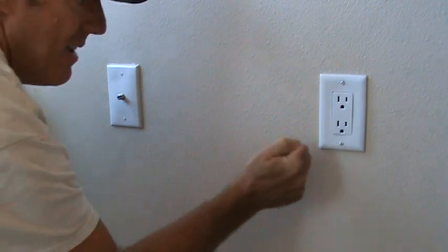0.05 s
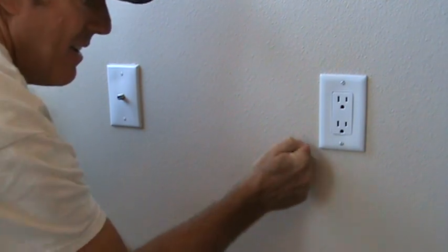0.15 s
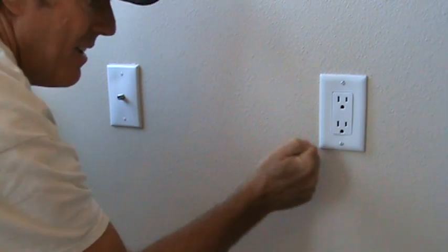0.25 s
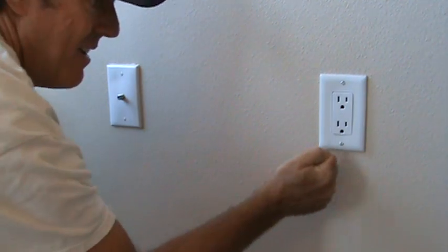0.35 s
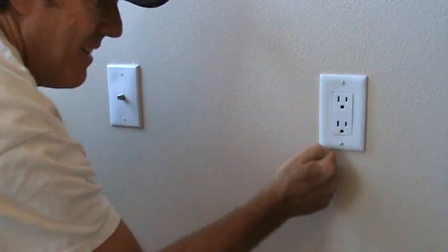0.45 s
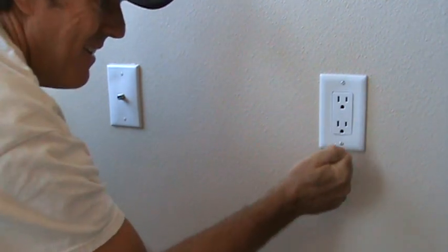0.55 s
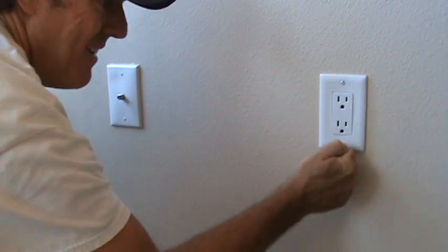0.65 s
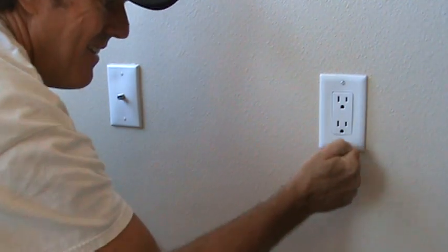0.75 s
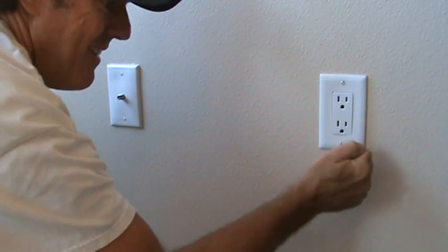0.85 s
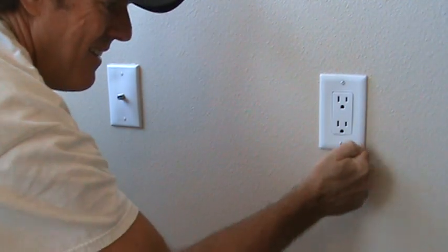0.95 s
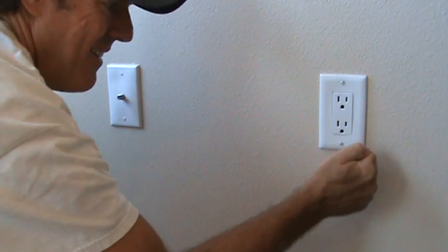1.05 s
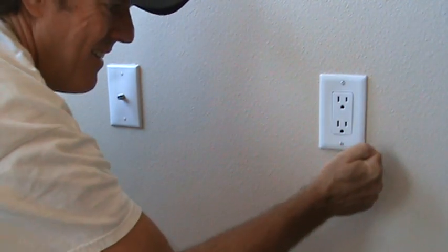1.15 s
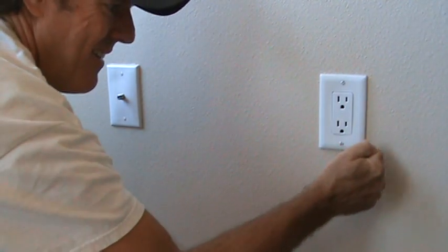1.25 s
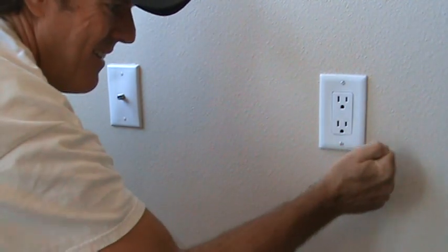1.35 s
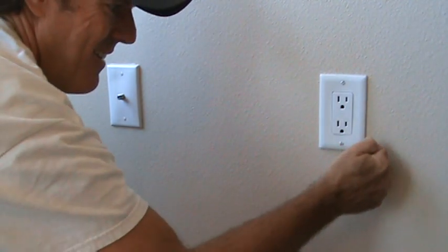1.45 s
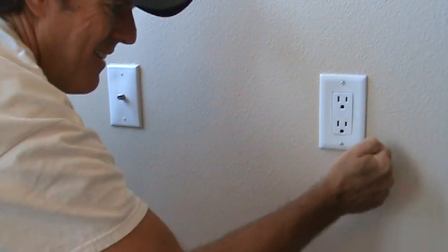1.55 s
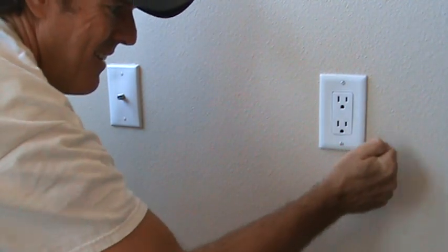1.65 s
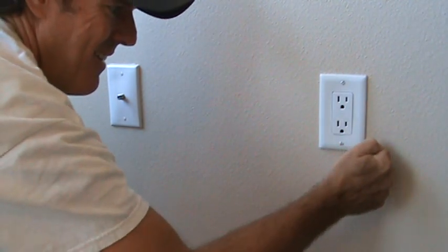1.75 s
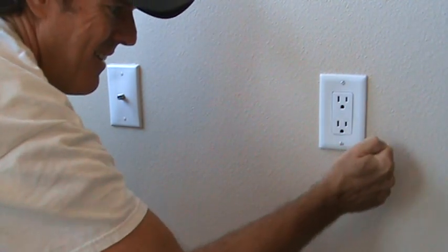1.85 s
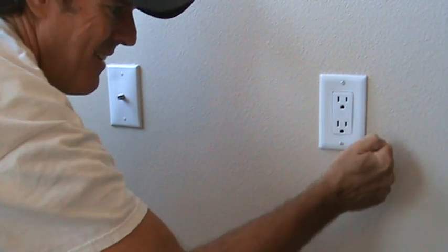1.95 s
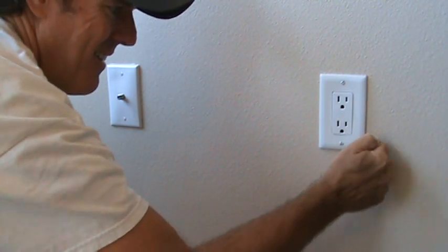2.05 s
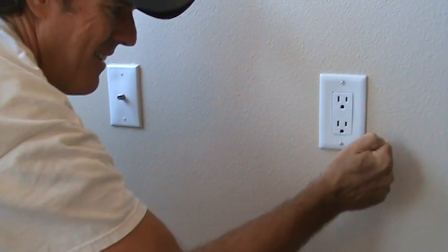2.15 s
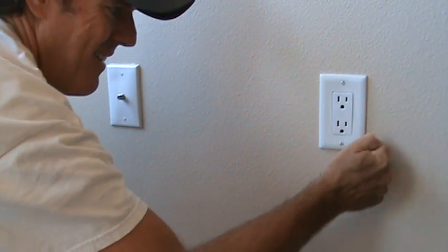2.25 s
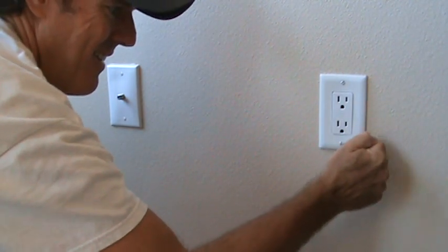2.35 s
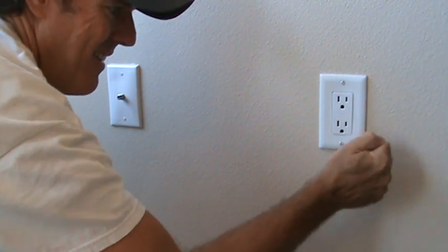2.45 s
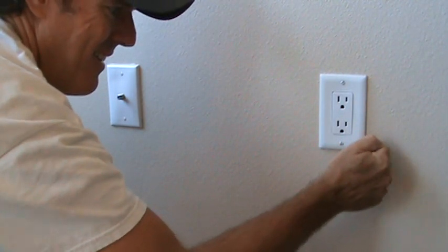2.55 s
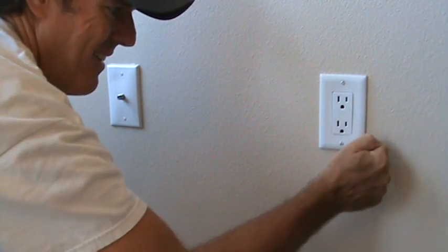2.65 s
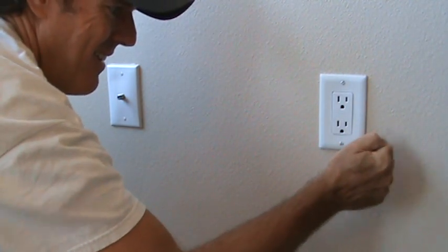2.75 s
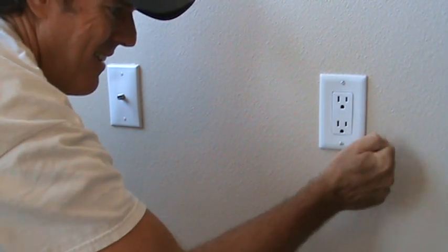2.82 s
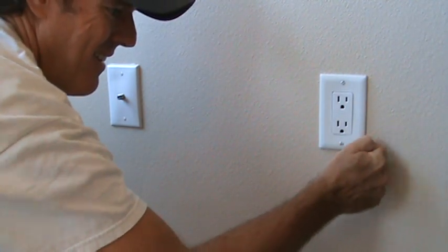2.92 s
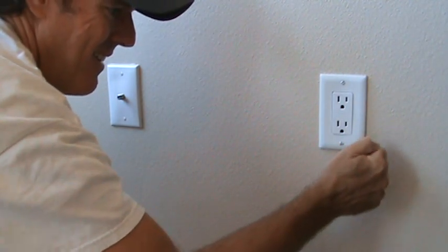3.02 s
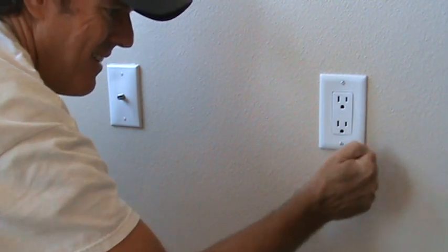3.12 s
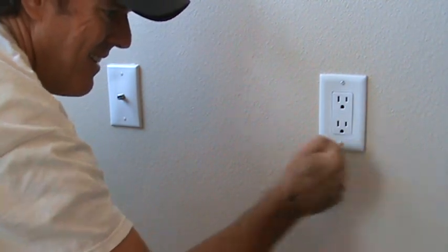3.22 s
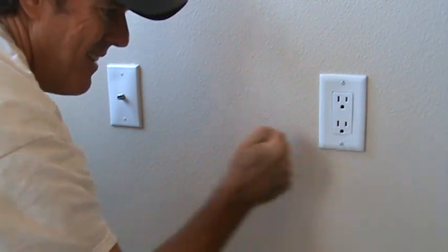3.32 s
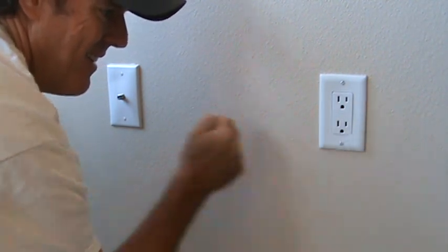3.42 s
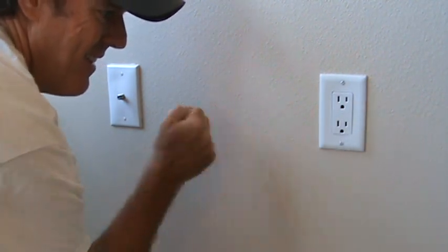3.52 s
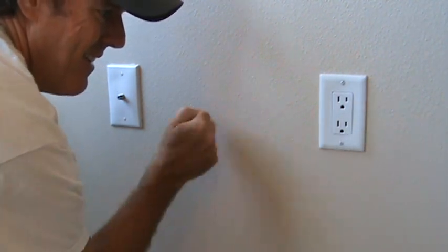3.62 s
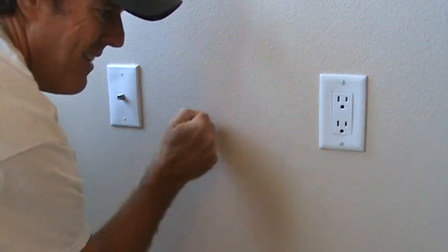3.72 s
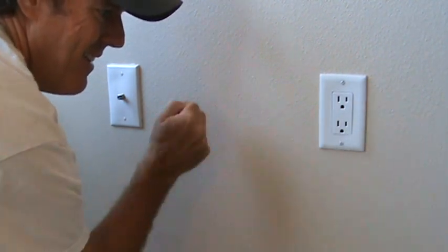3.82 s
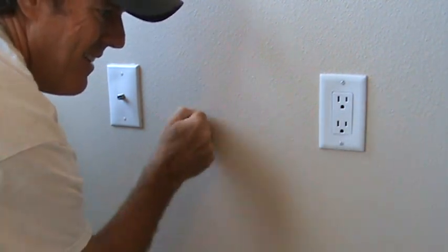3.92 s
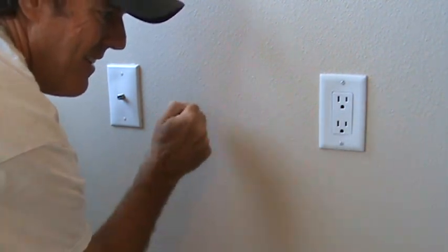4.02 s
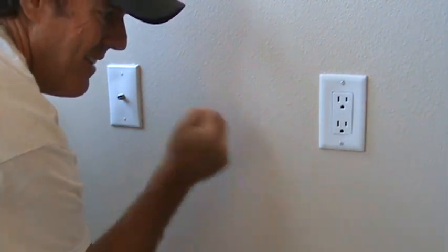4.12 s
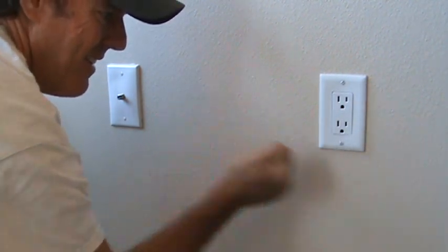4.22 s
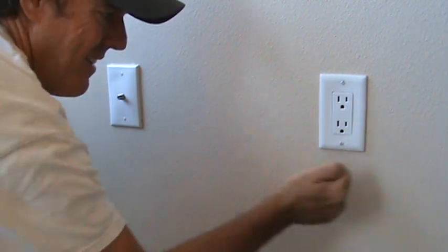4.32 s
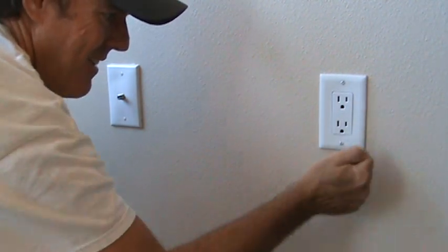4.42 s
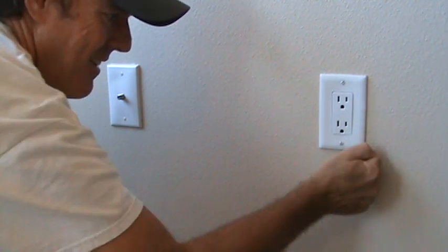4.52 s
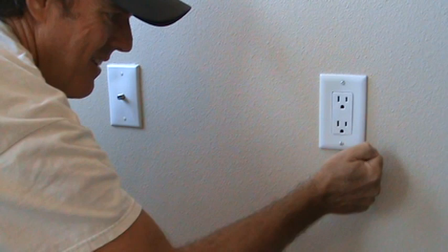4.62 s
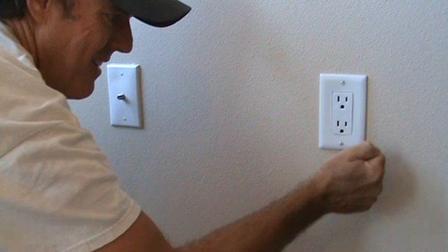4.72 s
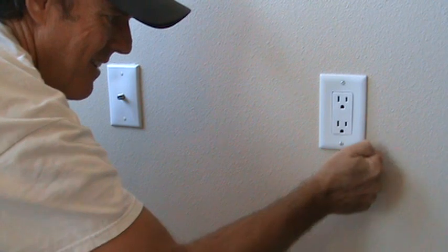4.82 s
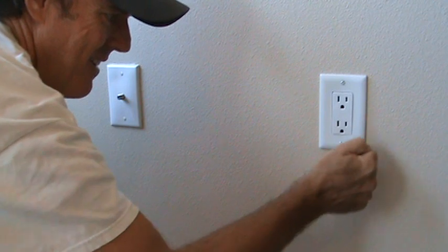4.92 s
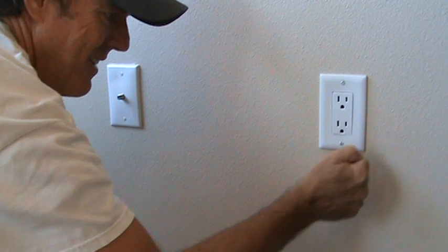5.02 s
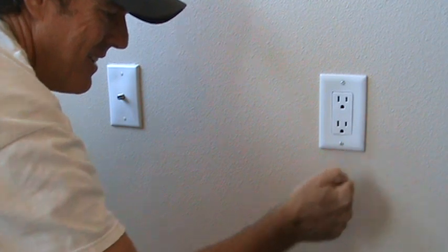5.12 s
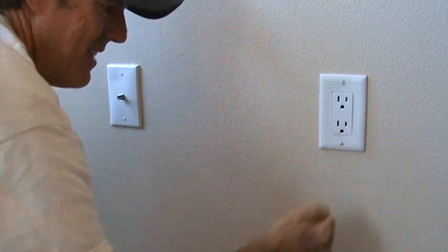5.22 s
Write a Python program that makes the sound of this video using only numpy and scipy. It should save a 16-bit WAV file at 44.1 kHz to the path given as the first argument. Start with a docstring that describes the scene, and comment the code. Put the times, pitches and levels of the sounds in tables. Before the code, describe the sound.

Knuckles rap evenly along a hollow plasterboard wall, with two tighter, firmer knocks over a stud, above a steady ventilation rush.

```python
"""Knuckles rap along a plasterboard wall, hunting for a stud: thirteen hollow knocks (the first with a
light second touch) and two tighter ones. Each blow is a force pulse that excites the board's damped modes,
boomier mid-bay and tighter over the stud; surfaces and the walls of a small room answer with echoes and a
noise tail, whose treble swells and then stops. Soft low thumps, the dying boom of an earlier knock and then
shifting weight, are damped swings. The steady rush of house ventilation is shaped noise with faint tones."""
import sys
import numpy as np
from scipy import signal
from scipy.fft import rfft, irfft
from scipy.io import wavfile

SR = 44100
rng = np.random.default_rng(int(sys.argv[2]) if len(sys.argv) > 2 else 0)


def int16_out(signal):
    """Quantize to a 16-bit WAV file."""
    q = np.round(np.clip(np.atleast_2d(signal).T, -1, 1) * 32767)
    wavfile.write(sys.argv[1], SR, q.astype(np.int16))


N = 232633

RING = 40000  # length of an impulse response, samples
TIME = np.arange(RING) / SR  # s


def undb(db):
    """Level to amplitude ratio: 20 dB is a factor of ten."""
    return 10 ** (np.asarray(db) / 20)


def curve(points, hz):
    """Interpolate (frequency [Hz], value) points on a logarithmic frequency axis."""
    point_hz, value = np.transpose(points)
    return np.interp(np.log(np.maximum(hz, 1)), np.log(point_hz), value)


def add(out, sound, start_s):
    """Superposition: pressures add, so mix a sound into out from start_s."""
    i = max(int(start_s * SR), 0)
    out[:, i:i + sound.shape[-1]] += sound[..., :N - i]


def ring(hz, t60):
    """Free vibration of one mode: a sine whose level falls 60 dB in t60 seconds."""
    return np.sin(2 * np.pi * hz * TIME) * undb(-60 * TIME / t60)


def ventilation(air_db=-41, pan_db=-.5, start_db=1.02, end_db=-0.15):
    """Broadband flow noise coloured by duct resonances, easing slightly, with tones of fan and electrics."""
    # spectrum of the rush: (frequency [Hz], relative density [dB])
    air_spectrum = [(25, -1), (50, -2.5), (82, -9.5), (122, -2.5), (165, -6), (260, -0.5), (350, -3.5),
                    (600, -9), (900, -12.5), (2200, -22), (3200, -25.5), (6000, -33.5), (9500, -40),
                    (15500, -41.5)]
    # stereo width of the rush: (frequency [Hz], side minus mid [dB])
    air_side = [(40, -21), (120, -8.5), (350, -11.5), (1000, -6), (2500, -6), (7000, -4.5), (13000, -7.5)]
    # duct resonances: (frequency [Hz], width [Hz], boost [dB])
    duct = [(369, 18, 4), (1415, 84, 3), (2250, 440, 4)]
    # steady hum and whine: (frequency [Hz], rms level before the left-right balance [dB])
    tones = [(118.4, -55.5), (258.4, -60), (328.4, -60), (500.6, -59.5), (2824, -74.5), (3431, -77),
             (10160, -87)]

    hz = np.fft.rfftfreq(N, 1 / SR)
    density_db = curve(air_spectrum, hz)
    for centre_hz, width_hz, boost_db in duct:
        density_db = density_db + boost_db / (1 + (2 * (hz - centre_hz) / width_hz) ** 2)

    mid, side = rfft(rng.standard_normal((2, N))) * undb(density_db)
    mid = irfft(mid, N)
    side = irfft(side * undb(curve(air_side, hz)), N)
    easing_db = np.linspace(start_db, end_db, N)
    air = np.array([mid + side, mid - side]) * undb(air_db + easing_db) / mid.std()

    t = np.arange(N) / SR
    hum = np.zeros(N)
    for tone_hz, level_db in tones:
        hum += np.sqrt(2) * undb(level_db) * np.sin(2 * np.pi * (tone_hz * t + rng.random()))
    balance = undb(np.array([[pan_db], [-pan_db]]) / 2)
    return (air + hum) * balance


def thumps(rise_s=0.0013, right_lag_s=0.0039, decay_cycles=6.8, settle_s=0.0308, settle_db=-4.5):
    """Damped free vibration: each soft low thump is a slow swing, followed by a weaker second one."""
    # soft low thumps of shifting weight; the one at 0.0 s is the dying boom of an earlier knock:
    # (time [s], level [dB], frequency [Hz])
    low_thumps = [(0.0, -22.5, 79), (0.177, -16, 59.3), (0.288, -15, 80), (0.776, -21, 71),
                  (3.593, -20, 41.2), (3.79, -23.5, 48), (3.874, -17, 58.7), (3.976, -22, 90),
                  (4.15, -26.5, 58.3)]

    out = np.zeros((2, N))
    for start_s, level_db, hz in low_thumps:
        decay = ring(hz, decay_cycles / hz)  # 60 dB down after decay_cycles swings
        left = undb(level_db) * decay * (1 - np.exp(-TIME / rise_s))
        right = np.interp(TIME - right_lag_s, TIME, left)
        swing = np.array([left, right])
        add(out, swing, start_s)
        add(out, undb(settle_db) * swing, start_s + settle_s * rng.uniform(0.49, 1.98))
    return out


def reflections(stud_trip_ms=4.208, first_return=-0.84, second_return=0.18, smear=0.0073):
    """Reflection: the bending wave first returns from the studs inverted; later the room sends echoes."""
    # later echoes from surfaces and the room's walls: (delay [ms], gain [ratio, negative = inverted])
    room_echoes = [(14.43, 0.21), (20.59, -0.24), (43.19, -0.25), (68.0, -0.044)]

    ms = 1000 * TIME[:4096]
    out = np.zeros(len(ms))
    out[0] = 1  # the direct sound
    stud_returns = [(stud_trip_ms, first_return), (2 * stud_trip_ms, second_return)]
    for delay_ms, gain in [*stud_returns, *room_echoes]:
        # the spread is a fixed share of the delay: the later, the duller
        pulse = np.exp(-.5 * ((ms - delay_ms) / (smear * delay_ms)) ** 2)
        out += gain * pulse / pulse.sum()
    return out[None]


def room(side=1.0, build_s=0.009):
    """Diffuse reverberation: band noise with its own decay per band follows the direct sound and returns."""
    # reverberation: (frequency [Hz], 60 dB decay time [s]); a negative time makes the band swell
    decay_times = [(60, 1.5), (130, 0.1), (250, 0.4), (600, 0.5), (1500, -0.4)]
    # colour of the tail: (frequency [Hz], level [dB])
    tail_colour = [(50, -14.5), (130, -6), (300, -6.5), (600, -6), (850, -6), (1200, -10)]

    hz = np.fft.rfftfreq(RING, 1 / SR)
    mid, wide = rng.standard_normal((2, RING))
    noise = rfft(np.array([mid + side * wide, mid - side * wide]))
    build = 1 - np.exp(-(TIME / build_s) ** 2)
    edges = 35 * 2 ** np.arange(0, 8, .5)  # half-octave bands, Hz
    out = np.zeros((2, RING))
    for low, high in zip(edges, edges[1:]):
        centre = np.sqrt(low * high)
        band = irfft(noise * ((hz >= low) & (hz < high)), RING)
        # bands above about 1.1 kHz swell until the response ends
        decay = np.exp(-np.log(1000) * TIME / curve(decay_times, centre))
        tail = band * decay * build
        share = 2 * (high - low) / SR  # the band's part of the whole spectrum
        energy = np.sum(tail ** 2, axis=1, keepdims=True)
        out += tail * undb(curve(tail_colour, centre)) * np.sqrt(share / energy)
    out[:, 0] += 1  # the direct sound
    return signal.fftconvolve(out, reflections(), axes=1)[:, :RING]


def board(modes):
    """Modal superposition: the board's answer to a tap, left and right, with alternating mode signs."""
    out = np.zeros((2, RING))
    for k, (hz, level_db, t60, pan_db) in enumerate(modes):
        sides = undb(level_db + np.array([pan_db, -pan_db]) / 2)
        out += (-1) ** k * np.outer(sides, ring(hz, t60))
    return out


def wall(modes, space, dent_db, dent_hz, dent_t60=0.0072, fade_s=0.3):
    """Local and global response: the struck spot snaps at once, the board rings till the frame soaks it up."""
    fading = board(modes) * np.exp(-(TIME / fade_s) ** 2)
    ringing = signal.fftconvolve(fading, space, axes=1)[:, :RING]
    return ringing + undb(dent_db) * ring(dent_hz, dent_t60)


def blow(contact_ms, follow_db, flesh_ms=2.4, scatter=0.2, scatter_s=0.0041):
    """Impact force: the knuckle's brief bump, 1 ms in, and the slower push of the fist behind it."""
    t = TIME[:1024]
    ms = 1000 * t - 1
    bone = np.exp(-8 * (ms / contact_ms) ** 2)
    flesh = np.exp(-np.abs(ms) / flesh_ms) * (ms > 0)
    force = bone / bone.sum() + undb(follow_db) * flesh / flesh.sum()
    # no two blows land on quite the same spot, so each has a slightly different colour
    spot = rng.standard_normal(len(t)) * np.exp(-t / scatter_s)
    spot = spot / np.linalg.norm(spot)
    return force + scatter * np.convolve(force, spot)[:len(t)]


def snap(contact_ms, snap_db=-43, snap_hz=1600, snap_s=0.0053, tick_db=-60, tick_hz=6800, tick_s=0.0049):
    """Contact noise, stronger for a shorter contact: a crack of the board's face, a tick of skin on paint."""
    t = TIME[:2048]
    crack, tick = rng.standard_normal((2, len(t)))
    crack_band = signal.butter(3, [snap_hz / 1.9, snap_hz * 1.06], "band", fs=SR, output="sos")
    tick_band = signal.butter(2, [tick_hz / 1.2, tick_hz * 1.08], "band", fs=SR, output="sos")
    crack = signal.sosfilt(crack_band, crack)
    tick = signal.sosfilt(tick_band, tick)
    crack = undb(snap_db) * crack / crack.std() * np.exp(-t / snap_s)
    tick = undb(tick_db) * tick / tick.std() * np.exp(-((t - tick_s) / 0.001) ** 2)
    return (crack + tick) * (0.68 / contact_ms) ** 3


def bass_lag(sound, hz):
    """Phase dispersion: a first-order all-pass delays what lies below hz and leaves levels alone."""
    pole = np.exp(-2 * np.pi * hz / SR)
    return signal.lfilter([-pole, 1], [1, -pole], sound)


def knocks(bay_db=-0.95, stud_db=-1.0, follow_db=3.5, follow_fall=106, left_lag_hz=63, right_lag_hz=220):
    """Source-filter convolution: each blow's force drives the wall where the hand is, in one room."""
    # knocks: (time [s], level [dB], contact time [ms])
    blows = [(0.136, 4.5, 0.99), (0.1682, -8.5, 0.92), (0.4117, -2, 0.91), (0.6842, -2.5, 1.0),
             (0.9405, 0.5, 0.66), (1.2058, 0.9, 0.81), (1.4631, 1.5, 0.68), (1.7367, 0.9, 0.88),
             (2.0264, 2.5, 0.78), (2.2918, -0.6, 0.92), (2.5955, 1, 0.75), (2.903, 1.4, 0.66),
             (3.6765, 4.5, 0.94), (3.935, 5.5, 0.95), (4.5216, -0.2, 0.72), (4.79, 3.5, 0.48)]
    # the hand's path: (time [s], place [0 = middle of the hollow bay, 1 = over the stud])
    hand = [(0.13, 0.2), (0.42, 0.015), (0.94, 0), (1.2, 0.073), (2.9, 0.093), (3.6, 0.71), (4.0, 0.73),
            (4.52, 0), (4.79, 0.078)]
    # the board between studs, with the low booms it shares with the room:
    # (frequency [Hz], relative level [dB], decay time before the frame's loss [s], left minus right [dB])
    bay_modes = [(56.4, -32.8, 0.645, -2.6), (72.8, -46.3, 1.039, -3.6), (103.4, -33.5, 0.357, -3.1),
                 (121.4, -41.0, 0.427, -6.8), (140.5, -19.8, 0.041, -4.0), (217.8, -22.0, 0.05, -9.1),
                 (245.4, -22.6, 0.569, -6.8), (288.5, -31.1, 0.183, -9.6), (344.7, -30.9, 0.083, -7.4),
                 (372.7, -37.2, 0.241, -6.4), (399.5, -28.4, 0.045, -4.3), (468.2, -24.0, 0.146, -5.0),
                 (542.2, -26.5, 0.073, -2.0), (593.2, -30.6, 0.064, -3.4), (725.9, -21.0, 0.056, -0.8),
                 (781.8, -28.1, 0.127, -0.3), (892.2, -23.3, 0.037, -1.3), (1012.1, -32.5, 0.077, -0.8),
                 (1100.7, -19.7, 0.016, -1.4), (1532.9, -33.2, 0.016, -1.5)]
    # the board where a stud stiffens it:
    # (frequency [Hz], relative level [dB], decay time before the frame's loss [s], left minus right [dB])
    stud_modes = [(53.4, -27, 0.097, -10), (101.2, -33.5, 0.22, 18), (162, -26.5, 0.09, -14),
                  (258.6, -27, 0.096, -14), (330, -23, 0.03, -16), (469, -6, 0.021, -2),
                  (495.6, -10, 0.051, -4.5), (614, -19, 0.017, 3), (717, -30, 0.18, -1),
                  (939, -17, 0.032, 4), (1260, -32.5, 0.012, -10)]

    space = room()
    out = np.zeros((2, N))
    bay = undb(bay_db) * wall(bay_modes, space, dent_db=-21.5, dent_hz=670)
    stud = undb(stud_db) * wall(stud_modes, space, dent_db=-14.5, dent_hz=540, dent_t60=0.025)
    for start_s, level_db, contact_ms in blows:
        place = np.clip(np.interp(start_s, *np.transpose(hand)), 0, 1)
        # the fist follows through where the board yields; follow_fall is in dB per unit of place
        force = undb(level_db) * blow(contact_ms, follow_db - follow_fall * place)
        response = (1 - place) * bay + place * stud
        struck = signal.fftconvolve(response, force[None], axes=1)
        add(out, struck, start_s - .001)  # the bump comes 1 ms into the force
        add(out, undb(level_db) * snap(contact_ms), start_s)
    left, right = out
    return np.array([bass_lag(left, left_lag_hz), bass_lag(right, right_lag_hz)])


def scene():
    """Linear superposition of ventilation, thumps and knocks."""
    return knocks() + thumps() + ventilation()


def record(dry, bottom_hz=15, top_hz=15750):
    """Band limiting: a gentle high-pass drops the deepest rumble and a steep low-pass cuts the top."""
    rumble_cut = signal.butter(1, bottom_hz, "high", fs=SR, output="sos")
    top_cut = signal.ellip(12, .1, 90, top_hz, fs=SR, output="sos")
    return signal.sosfilt(top_cut, signal.sosfilt(rumble_cut, dry))


dry = scene()
out = record(dry)
int16_out(out)
```